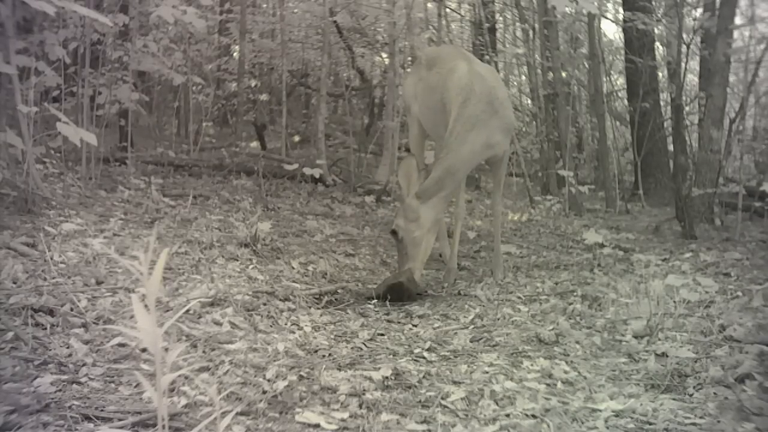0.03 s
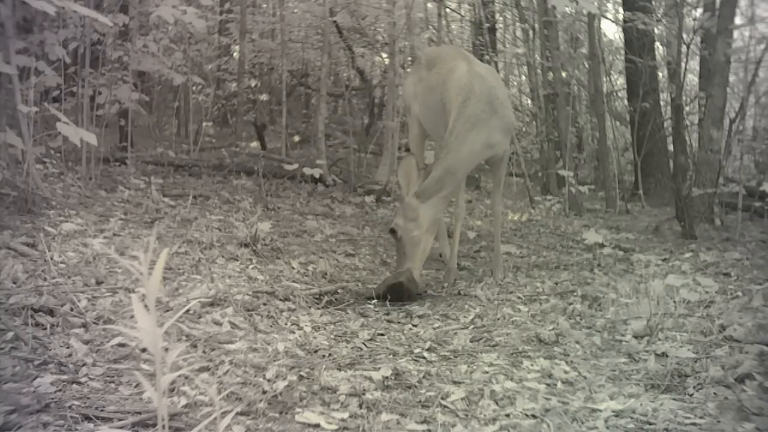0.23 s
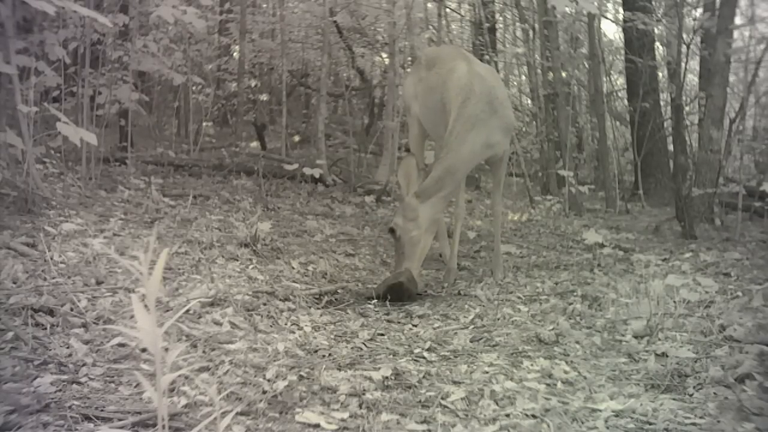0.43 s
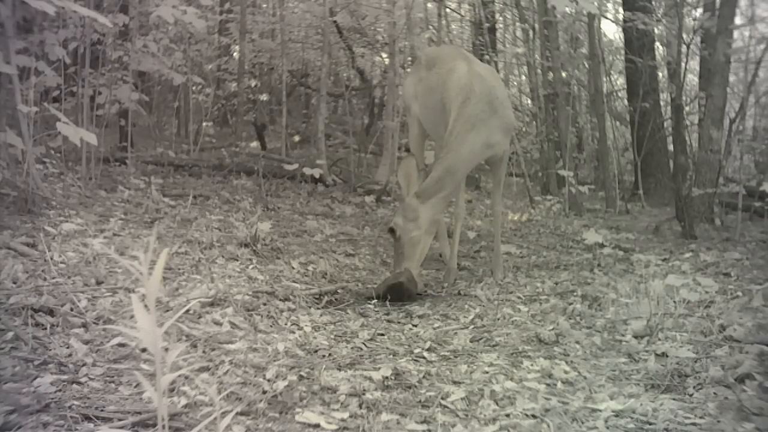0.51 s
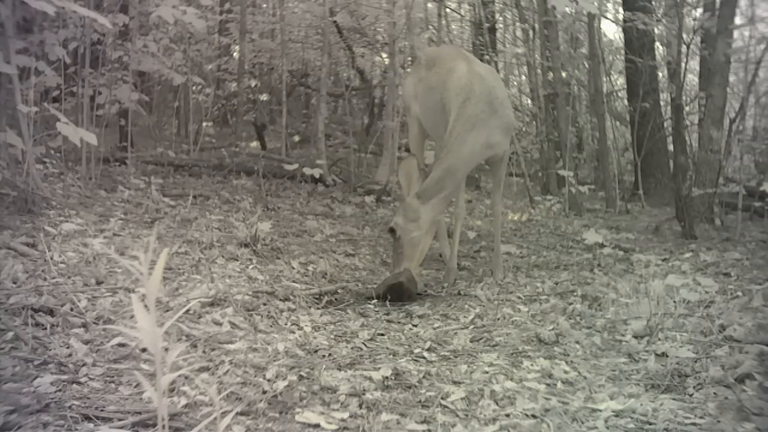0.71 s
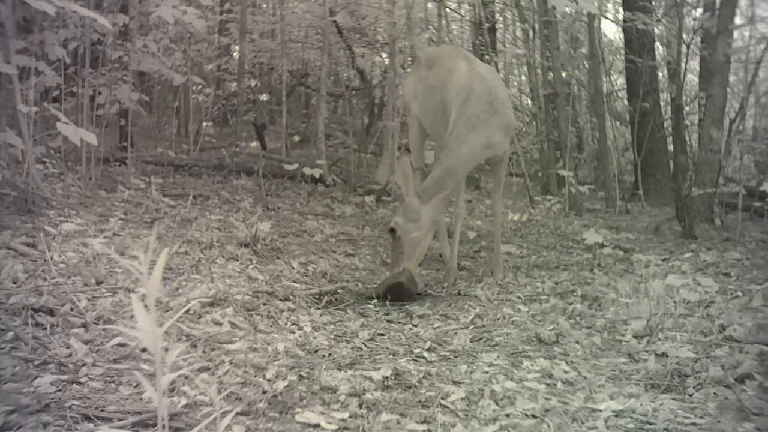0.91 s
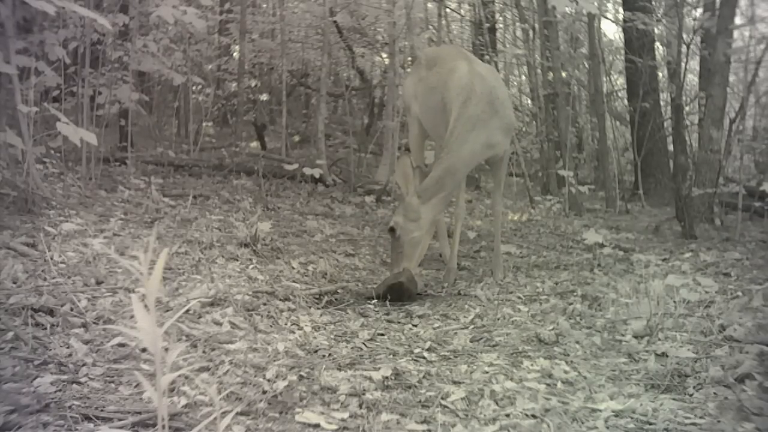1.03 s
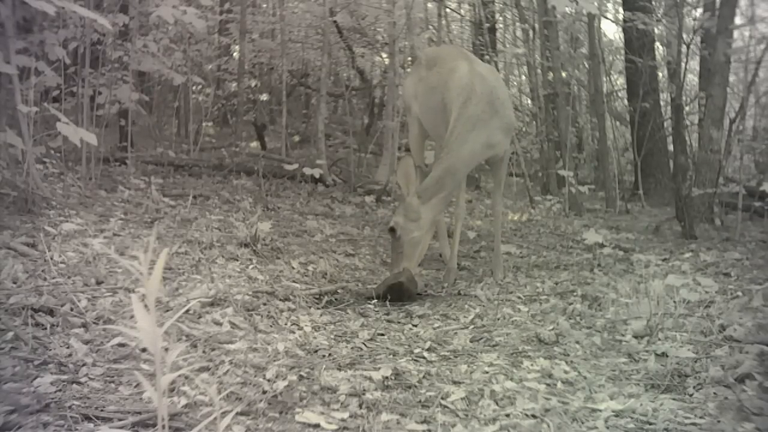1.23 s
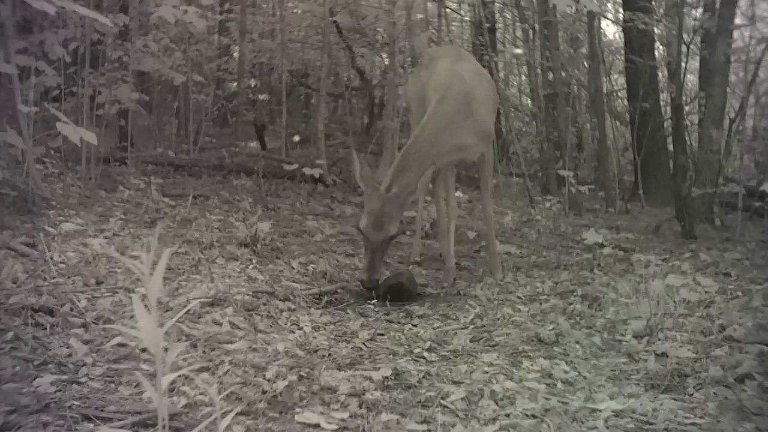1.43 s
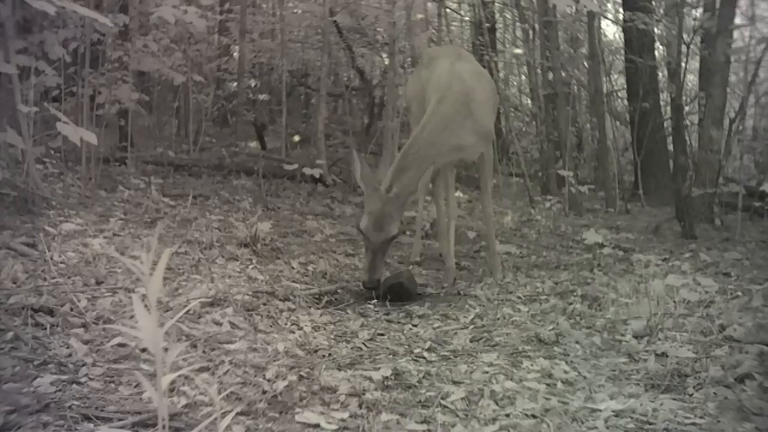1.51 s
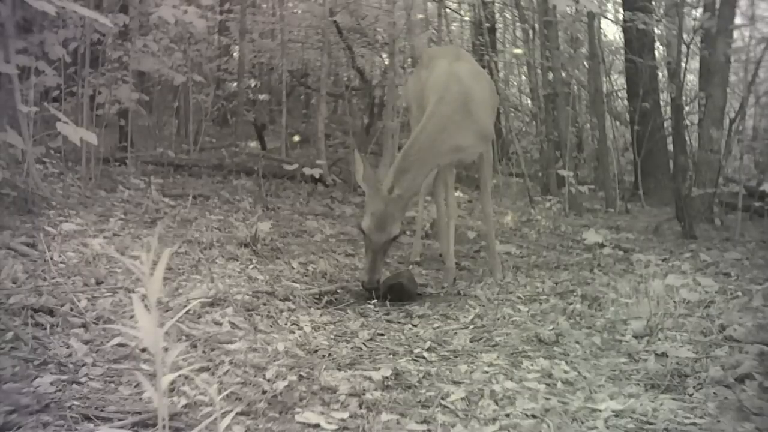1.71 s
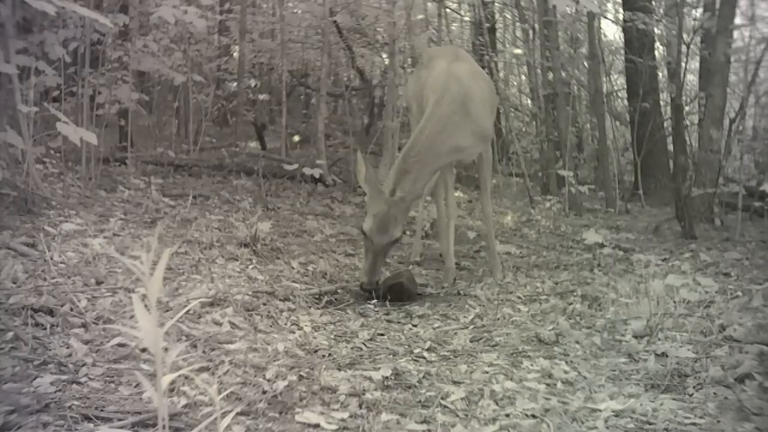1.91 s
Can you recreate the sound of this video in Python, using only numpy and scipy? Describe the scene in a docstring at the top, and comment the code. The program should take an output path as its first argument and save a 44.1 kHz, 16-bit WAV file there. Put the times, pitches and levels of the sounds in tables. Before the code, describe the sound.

One thin, rough animal whistle rises from about 0.27 to 0.59 seconds, climbing from high to higher and levelling off, with a diffuse forest echo. A low electrical thump at 0.22 and a bright plastic click at 0.24 precede it. Tiny leaf rustles come at 0.7-0.85. Coloured hiss, low buzz and faint whine sink, cut to silence at 1.16, hiss returns at 1.45, buzz at 1.63.

```python
"""Animal whistle in a forest, heard through a wildlife camera.

One thin, rough whistle slides upward: three unsteady sine lines, scattered by noise-tail echoes.
The camera adds coloured hiss, a low harmonic buzz, a faint whine, one electrical thump and
clicks of its housing, made of decaying modes and noise bursts. Swells of noise are dry leaves.
The hiss sinks away, the sound cuts out for a moment, then returns, the buzz last.
"""
import sys
import numpy as np
from scipy import signal
from scipy.fft import rfft, irfft
from scipy.io import wavfile

SR = 44100
rng = np.random.default_rng(int(sys.argv[2]) if len(sys.argv) > 2 else 0)


def to_wav(s):
    """Save 16-bit WAV."""
    ch = np.atleast_2d(s).T  # columns
    pcm = np.round(np.clip(ch, -1, 1) * 32767)  # PCM
    wavfile.write(sys.argv[1], SR, pcm.astype(np.int16))


N = 88200

# Call, rough while it climbs, clearer at the top: time_s, pitch_hz, unsteadiness_hz
CALL_PITCH_TRACK = [(.28, 3010, 200), (.33, 3280, 150), (.36, 3688, 160), (.40, 4112, 140),
                    (.44, 4328, 105), (.475, 4475, 75), (.52, 4494, 60), (.59, 4449, 45)]
# Call lines before the forest, rms: time_s, main_db, lower_side_db, upper_side_db
CALL_LINE_LEVELS = [(.265, -46, -61.5, -82), (.322, -39, -51.5, -69.5), (.352, -29.5, -41, -49.5),
                    (.395, -25, -35, -29), (.445, -23.5, -37, -32.5), (.48, -25, -49.5, -26),
                    (.535, -34, -51, -28), (.575, -34, -69, -40), (.59, -55, -73, -64)]
# Housing clicks, gain before the band filter: start_s, level_db
HOUSING_CLICKS = [(0.2431, -18), (1.1500, -39)]
# Housing modes, relative to the click: mode_hz, level_db, t60_s
HOUSING_MODES = [(2900, -15.5, .006), (4500, -10.5, .015), (4760, -21.5, .06), (4960, -16.5, 0.046),
                 (5200, -14.5, .012), (5900, -17, .006)]
# Leaf rustles: peak_s, level_db, decay_each_side_s
LEAF_RUSTLES = [(0.703, -40, 0.009), (0.722, -44, 0.0077), (0.788, -46.5, 0.0077), (.853, -53, .005)]
# Leaf noise colour, relative: freq_hz, density_db (per Hz)
LEAF_SPECTRUM = [(1500, -14), (3300, -4), (4000, -5), (5000, 3.5), (6200, -4), (8000, -20), (15000, -28)]
# Hiss colour, peaking where the housing resonates, relative: freq_hz, density_db (per Hz)
HISS_SPECTRUM = [(20, 1.5), (60, -3), (120, -2), (250, -8.5), (500, -13), (1000, -17.5), (1900, -21),
                 (3500, -24), (4300, -22.5), (4900, -19), (5400, -23), (6200, -29), (7300, -29.5),
                 (7900, -26), (8150, -30.5), (8450, -22.5), (8750, -32.5), (11000, -34), (15000, -38)]
# Hiss level, part common to both channels, rms: time_s, level_db
HISS_LEVEL_TRACK = [(0, -35.5), (.25, -35.5), (.445, -37), (.478, -41), (.502, -42), (.53, -36.5),
                    (.72, -38.5), (.79, -40.5), (.95, -46.5), (1.11, -50.5), (1.164, -50.5), (1.45, -35),
                    (1.56, -36), (2, -35)]
# Colour of the hiss that differs between channels, relative: freq_hz, density_db (per Hz)
SIDE_HISS_SPECTRUM = [(30, 21.5), (120, -10.5), (500, -31), (2000, -35.5), (8000, -36), (15000, -38.5)]

SIDE_TONE_OFFSET_HZ = 498.5
RASP_RATE_HZ, FLUTTER_DB = 180, 2  # corner of the pitch and level drift; spread of the level
DIRECT_DB = -4.5
SCATTER_DB, SCATTER_T60_S = -3.5, 0.3  # near trunks
FOREST_DB, FOREST_T60_S = -14.5, 0.71  # deeper wood
THUMP_START_S, THUMP_DB = 0.216, 0  # gain before the envelope
THUMP_RISE_S, THUMP_FALL_S, THUMP_SWING_HZ = 0.0034, 0.033, 3.1
CRACK_DB, CRACK_DECAY_S = -11.5, 0.001  # relative to the click
CHATTER_DB, CHATTER_DECAY_S = 2, 0.0124  # the loose shell sizzles on
LEAF_GRAIN_DB, LEAF_GRAIN_RATE_HZ = 3.06, 400
BUZZ_HZ, BUZZ_DB, BUZZ_EDGE_HZ = 29.45, -36, 220  # frame rate; rms; corner of the treble loss
BUZZ_WAVER_DB, BUZZ_WAVER_RATE_HZ = 1.3, 5.2
BUZZ_RETURN_S, BUZZ_RISE_S = 1.63, 0.043
WHINE_HZ, WHINE_DB = 11920, -73.5
SIDE_HISS_DB = -16  # relative to the common hiss
MUTE_FROM_S, MUTE_TO_S, MUTE_RAMP_S = 1.164, 1.451, 0.000066
CUTOFF_HZ = 15250


def from_db(db):
    """Decibels to gain."""
    return 10 ** (np.asarray(db) / 20)


def rms_one(x):
    """Scale to an rms of 1."""
    return x / np.sqrt(np.mean(x ** 2) + 1e-20)


def seconds():
    """Time of every sample."""
    return np.arange(N) / SR


def in_time(rows):
    """Table columns as curves over time."""
    time_s, *columns = np.transpose(rows)
    return [np.interp(seconds(), time_s, column) for column in columns]


def drift(rate_hz):
    """Smooth random curve, rms 1: white noise rolled off above rate_hz."""
    bins_hz = np.fft.rfftfreq(N, 1 / SR)
    rolloff = 1 + (bins_hz / rate_hz) ** 2
    return rms_one(irfft(rfft(rng.standard_normal(N)) / rolloff, N))


def noise(spectrum):
    """Noise of the given colour, rms 1."""
    freq_hz, density_db = np.transpose(spectrum)
    bins_hz = np.fft.rfftfreq(N, 1 / SR)
    gain = from_db(np.interp(np.log(bins_hz + 1), np.log(freq_hz), density_db))
    return rms_one(irfft(rfft(rng.standard_normal(N)) * gain, N))


def burst(age_s, decay_s, low_hz, high_hz):
    """Band noise that starts at once and dies away exponentially."""
    band = signal.butter(2, [low_hz, high_hz], "band", fs=SR, output="sos")
    envelope = (age_s > 0) * np.exp(-age_s / decay_s)
    return signal.sosfilt(band, rng.standard_normal(N) * envelope + 1e-18)


def echoes(x, t60_s):
    """Dense reflections: convolution with a decaying noise tail of unit energy."""
    tail = rng.standard_normal(N) * from_db(-60 * seconds() / t60_s)
    return signal.fftconvolve(x, tail / np.sqrt(np.sum(tail ** 2)))[:N]


def call():
    """Rising, rasping whistle with a side tone on either hand; the upper takes over at the top."""
    t = seconds()
    pitch_hz, unsteadiness_hz = in_time(CALL_PITCH_TRACK)
    pitch_hz = pitch_hz + unsteadiness_hz * drift(RASP_RATE_HZ)
    out = np.zeros(N)
    for side, level_db in zip((0, -1, 1), in_time(CALL_LINE_LEVELS)):
        line_hz = pitch_hz + side * SIDE_TONE_OFFSET_HZ
        phase = 2 * np.pi * (np.cumsum(line_hz) / SR + rng.random())
        gain = from_db(level_db + FLUTTER_DB * drift(RASP_RATE_HZ))
        out += gain * np.sqrt(2) * np.sin(phase)
    return out * (t > CALL_LINE_LEVELS[0][0]) * (t < CALL_LINE_LEVELS[-1][0])


def forest(x):
    """Near trunks smear the sound; the deeper wood adds a soft tail."""
    direct = from_db(DIRECT_DB) * x
    scatter = from_db(SCATTER_DB) * echoes(x, SCATTER_T60_S)
    tail = from_db(FOREST_DB) * echoes(x, FOREST_T60_S)
    return direct + scatter + tail


def thump():
    """Switching jolt: the voltage drops quickly and swings slowly back."""
    age_s = np.maximum(seconds() - THUMP_START_S, 0)
    envelope = (1 - np.exp(-age_s / THUMP_RISE_S)) * np.exp(-age_s / THUMP_FALL_S)
    return -from_db(THUMP_DB) * envelope * np.cos(2 * np.pi * THUMP_SWING_HZ * age_s)


def housing_clicks():
    """Tiny crack, short bright ring of the plastic's modes, a little chatter after it."""
    out = np.zeros(N)
    for start_s, click_db in HOUSING_CLICKS:
        age_s = np.maximum(seconds() - start_s, 0)
        ring = np.zeros(N)
        for mode_hz, mode_db, t60_s in HOUSING_MODES:
            ring += from_db(mode_db - 60 * age_s / t60_s) * np.sin(2 * np.pi * mode_hz * age_s)
        crack = from_db(CRACK_DB) * burst(age_s, CRACK_DECAY_S, 2500, 6000)
        chatter = from_db(CHATTER_DB) * burst(age_s, CHATTER_DECAY_S, 4600, 5220)
        out += from_db(click_db) * (ring + crack + chatter)
    band = signal.butter(2, [2300, 6500], "band", fs=SR, output="sos")
    return signal.sosfilt(band, out)


def leaves():
    """Brief rustles in the leaf litter: coloured noise with a fast, grainy level."""
    t = seconds()
    swell = np.zeros(N)
    for peak_s, level_db, decay_s in LEAF_RUSTLES:
        swell += from_db(level_db) * np.exp(-np.abs(t - peak_s) / decay_s)
    rustle = swell * noise(LEAF_SPECTRUM)
    grain = from_db(LEAF_GRAIN_DB * drift(LEAF_GRAIN_RATE_HZ))
    return rustle * grain


def buzz():
    """Low electrical buzz, one cusp per frame from 1/k^2 harmonics; returns late after the break."""
    t = seconds()
    phase = 2 * np.pi * BUZZ_HZ * (t - MUTE_FROM_S)
    wave = np.zeros(N)
    for k in range(1, 20):
        wave -= np.cos(k * phase) / k ** 2 / np.hypot(1, k * BUZZ_HZ / BUZZ_EDGE_HZ)
    running = (t < MUTE_FROM_S) + np.clip((t - BUZZ_RETURN_S) / BUZZ_RISE_S, 0, 1)
    gain = from_db(BUZZ_DB + BUZZ_WAVER_DB * drift(BUZZ_WAVER_RATE_HZ))
    return gain * rms_one(wave) * running


def whine():
    """Faint, high, steady sine."""
    return from_db(WHINE_DB) * np.sqrt(2) * np.sin(2 * np.pi * WHINE_HZ * seconds())


def hiss():
    """Still air and microphone noise, nearly the same in both channels."""
    level_db, = in_time(HISS_LEVEL_TRACK)
    common = noise(HISS_SPECTRUM)
    side = from_db(SIDE_HISS_DB) * noise(SIDE_HISS_SPECTRUM)
    opposite_signs = np.array([[1], [-1]])
    return from_db(level_db) * (common + side * opposite_signs)


def scene():
    """Call and leaves over the camera's own noises."""
    return hiss() + forest(call()) + leaves() + housing_clicks() + buzz() + whine() + thump()


def record(dry):
    """Sound cuts out briefly; a steep low-pass removes the top."""
    t = seconds()
    outside_mute_s = np.maximum(MUTE_FROM_S - t, t - MUTE_TO_S)
    live = np.clip(outside_mute_s / MUTE_RAMP_S, 0, 1)
    lowpass = signal.ellip(12, 0.1, 80, CUTOFF_HZ, fs=SR, output="sos")
    return signal.sosfilt(lowpass, dry * live + 1e-18)


dry = scene()
out = record(dry)
to_wav(out)
```